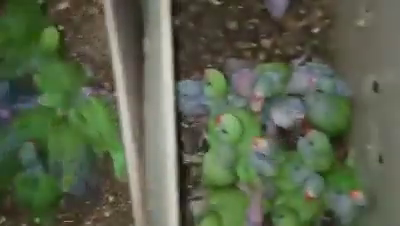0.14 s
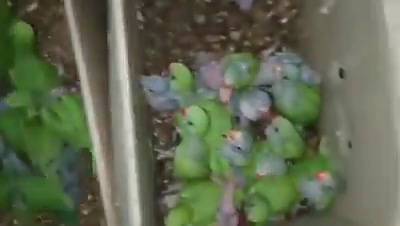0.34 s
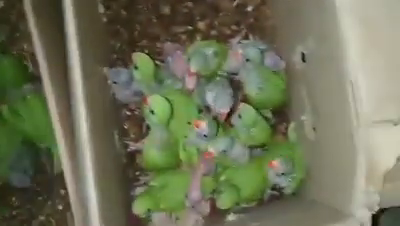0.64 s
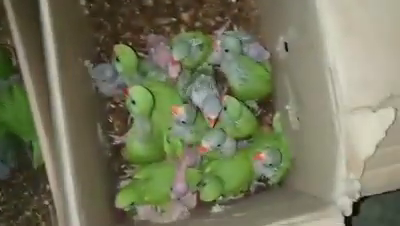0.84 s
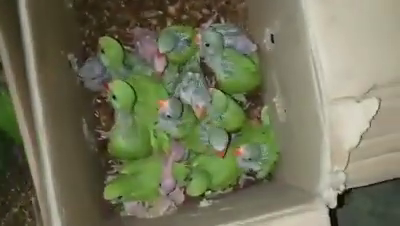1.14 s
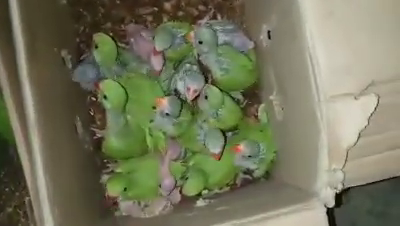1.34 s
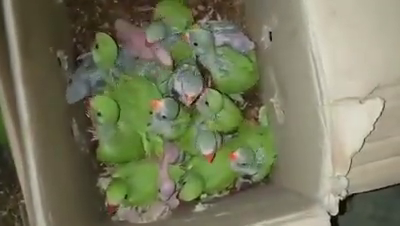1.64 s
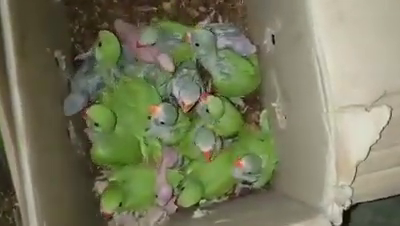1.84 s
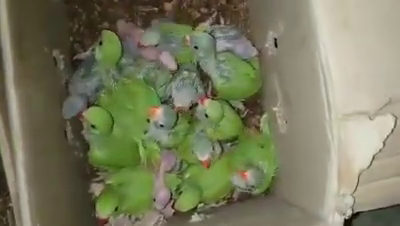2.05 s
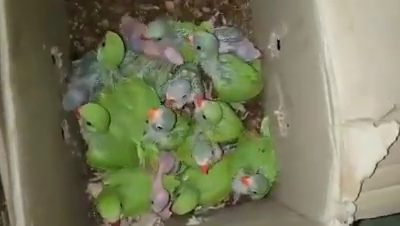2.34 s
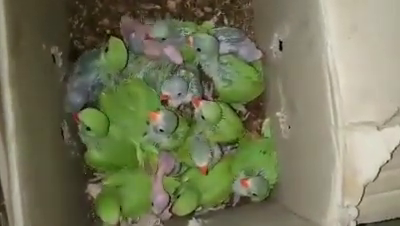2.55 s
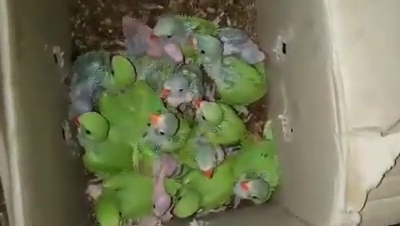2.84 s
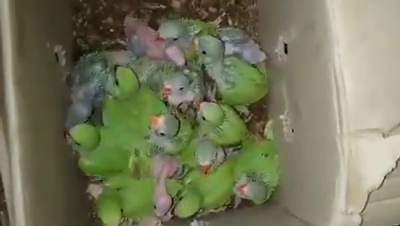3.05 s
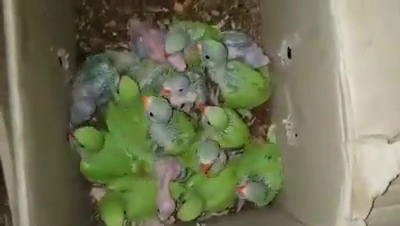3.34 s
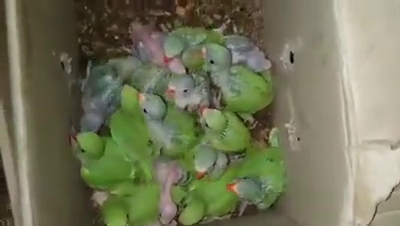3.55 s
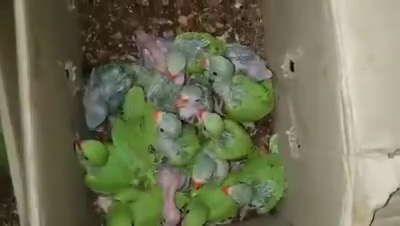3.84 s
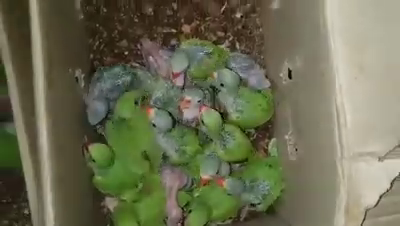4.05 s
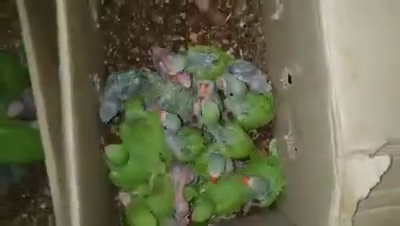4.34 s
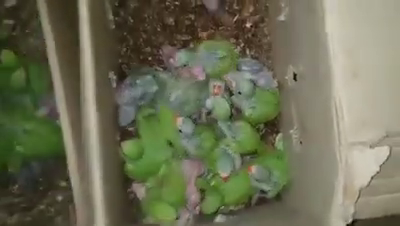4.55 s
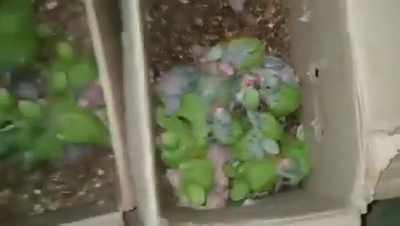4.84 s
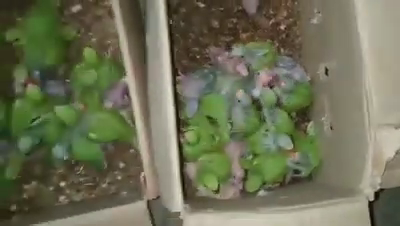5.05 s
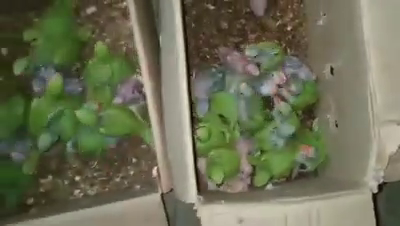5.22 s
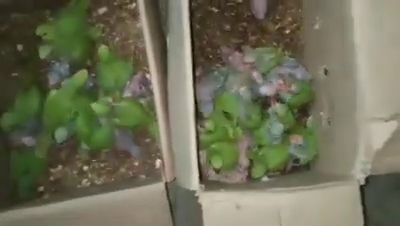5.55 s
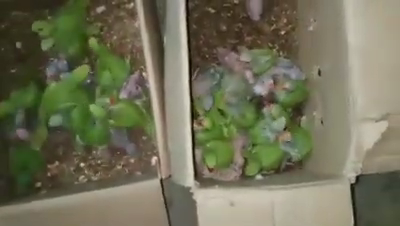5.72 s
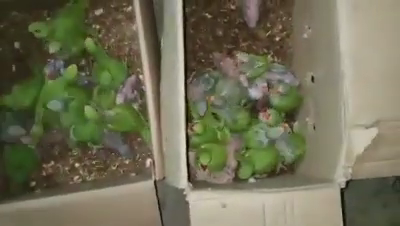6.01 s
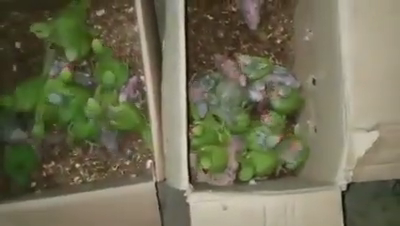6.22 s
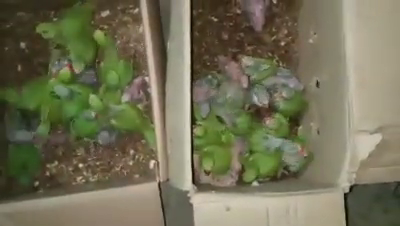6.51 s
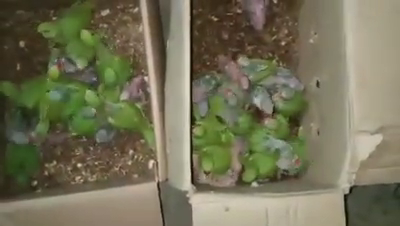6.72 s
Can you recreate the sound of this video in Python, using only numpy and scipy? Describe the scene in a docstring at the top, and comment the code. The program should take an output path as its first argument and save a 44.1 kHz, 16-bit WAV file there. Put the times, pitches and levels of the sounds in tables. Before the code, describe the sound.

Rough, squeaky begging calls from young parrots come in two quick rhythmic bursts, with quiet rasping, faint peeps and distant dove coos around them.

```python
"""Hoarse begging whistles leap up and slide down: parrot chicks call in turns and together,
in an open cardboard box just under a hand-held phone. Each whistle is a stack of overtones plus breath noise.
One chick rasps softly in the pause (clicks ringing resonances) and a small one peeps (short tones).
Feet scratch the litter (bursts of noise), doves coo further off (wavering tones), and behind them is
a dull murmur of the yard (filtered noise), turned down and let back by the phone's noise suppressor."""
import sys
import numpy as np
from scipy import signal
from scipy.fft import rfft, irfft
from scipy.io import wavfile

SR = 44100
rng = np.random.default_rng(int(sys.argv[2]) if len(sys.argv) > 2 else 0)


def int16_out(signal):
    """Quantize to a 16-bit WAV file."""
    q = np.round(np.clip(np.atleast_2d(signal).T, -1, 1) * 32767)
    wavfile.write(sys.argv[1], SR, q.astype(np.int16))


N = 303408
T = np.arange(N) / SR  # time of every sample, in seconds
BIN_HZ = np.arange(N // 2 + 1) * SR / N  # pitch of every spectrum bin
TOP_HZ = 15700  # the phone's top limit: overtones above it are left out, and the final filter cuts here


def undb(db):
    """Turn decibels into a gain."""
    return 10 ** (np.asarray(db) / 20)


def shape_db(table, hz):
    """Read a (pitch_hz, level_db) table, with straight lines between points on a log-pitch axis."""
    table_hz, table_db = np.transpose(table)
    return np.interp(np.log(np.maximum(hz, 1)), np.log(table_hz), table_db)


def colour(x, table):
    """Filter a sound by a (pitch_hz, level_db) table."""
    return irfft(rfft(x) * undb(shape_db(table, BIN_HZ)), N)


def unit(x):
    """Scale to an rms (average strength) of 1."""
    return x / np.sqrt(np.mean(x ** 2))


def wobble(rate_hz):
    """Slow random drift of rms 1: noise with everything faster than rate_hz smoothed away."""
    smoother = signal.butter(2, rate_hz, fs=SR, output="sos")
    return unit(signal.sosfilt(smoother, rng.standard_normal(N)))


def band(kind, hz, order):
    """A filter that keeps only part of the pitch range."""
    return signal.butter(order, hz, kind, fs=SR, output="sos")


def gate(t, start, end, rise, fall):
    """Ramp up from start over the rise time, then die away exponentially after end."""
    return np.clip((t - start) / rise, 0, 1) * np.exp(-np.maximum(t - end, 0) / fall)


def knee(ms, round_ms):
    """Flat at zero before 0, slope 1 after, with a rounded corner."""
    return round_ms * np.logaddexp(0, ms / round_ms)


# How throat and beak strengthen each pitch: pitch_hz [Hz], level_db [dB]
THROAT_TONE = [(800, -25), (1400, -12), (2400, -8.5), (3050, -5.5), (4050, -0.5), (4600, -4), (5200, -5),
               (6200, -11.5), (7300, -1.5), (8500, -14), (11500, -21.5), (14500, -13.5), (16000, -18)]
# The same throat blown by breath alone: pitch_hz [Hz], level_db [dB per Hz]
BREATH_TONE = [(300, -42), (885, -25), (1690, -9), (2450, -3), (3100, -3), (4050, -2), (5200, -10),
               (6200, -16), (7100, -11), (8500, -21), (11500, -26.5), (14700, -20), (16000, -33.5)]


def chick(calls, round_ms, climb_hz, drop_hz, hold_ms, dip_hz, dip_ms, tilt_db, fundamental_db, tired_db,
          breath_db, fade_db, strong, strong_db, tire_s, wear):
    """Overtones follow an arch of pitch through the throat, hoarse at the start and the break-off of a call."""
    out = np.zeros(N)
    jitter = wobble(350)
    flutter = [wobble(85) for _ in range(12)]
    breath = unit(colour(rng.standard_normal(N), BREATH_TONE))
    for apex_s, apex_hz, slide_hz_per_ms, level_db, lead_ms in calls:
        fresh = np.exp(-(apex_s - calls[0][0]) / tire_s)  # 1 at the first call; a fresh bird sings purer
        length_ms = hold_ms + drop_hz / slide_hz_per_ms  # the call breaks off after sliding by drop_hz
        first = max(int((apex_s - lead_ms / 1000) * SR), 0)
        last = min(int((apex_s + (length_ms + 90) / 1000) * SR), N)
        span = slice(first, last)
        ms = (T[span] - apex_s) * 1000  # time from the pitch apex

        corner_ms = round_ms * (lead_ms / 25) ** 4  # a long run-up gives a round arch
        hz = apex_hz - slide_hz_per_ms * knee(ms - hold_ms, corner_ms)
        hz -= climb_hz * np.clip(-ms / lead_ms, 0, 1) ** (lead_ms / 16)
        # a held call dips midway and sags; a negative dip sharpens the apex
        hz -= dip_hz * np.exp(-((ms - hold_ms / 2) / dip_ms) ** 2)
        hz -= 1.3 * np.clip(ms, 0, hold_ms)
        hoarse = np.exp(-(ms + lead_ms) / 17.0) + np.exp(np.minimum(ms - length_ms, 0) / 5.8)
        roughness = .004 + wear * (1 - fresh) + .06 * hoarse
        hz = np.maximum(hz, .5 * apex_hz) * (1 + roughness * jitter[span])
        phase = 2 * np.pi * np.cumsum(hz) / SR

        voice = np.zeros(len(ms))
        for k in range(1, 12):  # k = 1 is the fundamental
            gain_db = shape_db(THROAT_TONE, k * hz) + tilt_db * np.log2(k)
            if k == 1:
                gain_db += fundamental_db + tired_db * (1 - fresh)
            if k == strong:  # the partial that stands out
                gain_db += strong_db * fresh
            if k > strong:  # the upper overtones open up fully only at the apex
                gain_db -= 5.24 * np.clip(-ms / 8, 0, 1)
            patchy_db = np.clip(k * hz / 1100 - 2.6, 1.2, 8) * flutter[k][span]  # high overtones break up
            partial = np.sin(k * phase + .4 * k * k) * (k * hz < TOP_HZ)
            voice += undb(gain_db + patchy_db) * partial
        # the pure voice sets in as the pitch nears its apex
        voice *= gate(ms, -lead_ms, length_ms - 8.0, 17.4, 1.8)
        voice *= 1.08 + 0.45 * gate(ms, -.7 * lead_ms, length_ms, 3.1, 4.0)
        voice *= undb(2.5 - fade_db * np.clip(ms / length_ms, 0, 1))  # fades after the apex

        air = undb(breath_db + 4.84 * (3 - fresh)) * (0.1 + 0.46 * hoarse) * breath[span]
        air *= gate(ms, -lead_ms, length_ms, 3.1, 12.2)
        out[span] += undb(level_db) * (voice + air)
    return out


# Calls of the high chick: apex_s [s], apex_hz [Hz], slide [Hz per ms], level_db [dB, relative],
# lead_ms, the run-up to the apex [ms]
HIGH_CALLS = [(2.957, 2322, 18, -19.5, 32), (3.13, 2100, 19, -19, 25), (3.302, 2155, 18, -18, 27),
              (3.479, 2170, 17, -18, 25), (3.66, 2255, 16, -18, 32), (3.84, 2290, 19, -16, 31),
              (4.018, 2235, 19, -15.5, 27), (4.196, 2200, 21, -15, 26), (4.368, 2182, 18, -17.5, 24),
              (4.538, 2160, 18, -17.5, 24), (4.708, 2098, 19.5, -18, 24), (4.869, 2134, 15, -24, 24),
              (5.03, 2120, 19, -18, 24), (5.192, 2140, 20, -17, 22), (5.358, 2253, 23, -18, 22),
              (5.526, 2168, 18, -17, 15), (5.696, 2130, 17, -18.5, 24), (5.866, 2084, 20, -18, 21),
              (6.03, 2158, 21, -18, 24), (6.197, 2125, 24, -17, 23), (6.349, 2070, 21, -17.5, 21),
              (6.505, 2067, 19, -18, 21), (6.664, 2202, 21, -17.5, 19), (6.823, 2084, 21, -17.5, 21)]


def high_chick():
    """The highest voice: no hold at the top, a sharpened apex and a strong second partial."""
    return chick(HIGH_CALLS, round_ms=2.6, climb_hz=1250, drop_hz=989, hold_ms=0, dip_hz=-17.5, dip_ms=5.7,
                 tilt_db=-4.0, fundamental_db=0.23, tired_db=-9.5, breath_db=-9.5, fade_db=0.35,
                 strong=2, strong_db=9.0, tire_s=2.52, wear=0.0061)


# Calls of the low chick: apex_s [s], apex_hz [Hz], slide [Hz per ms], level_db [dB, relative], lead_ms [ms]
LOW_CALLS = [(-.025, 1550, 11, -22, 27.5), (.127, 1538, 14, -22.5, 26.76), (.281, 1525, 15, -22.5, 24.33),
             (.44, 1492, 13, -26, 25), (4.356, 1697, 16, -25.5, 33.55), (4.522, 1654, 14, -26.5, 33.4),
             (4.688, 1620, 8.6, -27, 29.8), (4.861, 1570, 9.9, -25.5, 31.1),
             (5.04, 1610, 9.2, -26.5, 27.17), (5.212, 1540, 9, -26, 27.78), (5.395, 1626, 8, -24.5, 28.28),
             (5.588, 1620, 7.6, -26, 27.43)]


def low_chick():
    """A lower voice that roughens as it tires, with a strong third partial."""
    return chick(LOW_CALLS, round_ms=4, climb_hz=850, drop_hz=716, hold_ms=0, dip_hz=-8.5, dip_ms=7.0,
                 tilt_db=-0.35, fundamental_db=6.5, tired_db=2.33, breath_db=-6.5, fade_db=9.0,
                 strong=3, strong_db=5.5, tire_s=3.6, wear=0.026)


# Calls of the wavering chick: apex_s [s], apex_hz [Hz], slide [Hz per ms], level_db [dB, relative], lead_ms [ms]
WAVERING_CALLS = [(-.012, 1516, 12, -24, 26.6), (.177, 1500, 13, -21, 26.96),
                  (.366, 1435, 10.7, -19.5, 21.9), (.557, 1401, 10.6, -17.5, 27.07),
                  (.758, 1343, 11, -18.5, 29.96), (.972, 1431, 10.3, -18.5, 30.12)]


def wavering_chick():
    """A voice that holds its pitch for a moment, dips midway and then slides down."""
    return chick(WAVERING_CALLS, round_ms=3.0, climb_hz=900, drop_hz=485, hold_ms=30, dip_hz=100, dip_ms=8.3,
                 tilt_db=-3.0, fundamental_db=-2.15, tired_db=-9.5, breath_db=-2, fade_db=3.8,
                 strong=3, strong_db=4.5, tire_s=14.0, wear=.015)


# Soft rasps: start_s [s], end_s [s], level_db [dB]
RASP_TIMES = [(1.09, 1.236, -44), (1.336, 1.844, -44), (2.811, 2.96, -54)]
# Resonances the rasps ring: pitch_hz [Hz], width_hz [Hz], level_db [dB, relative]
RASP_RESONANCES = [(694, 270, -4), (1744, 216, 9), (2270, 470, 0.5), (3715, 600, -9), (6840, 1300, 1),
                   (14430, 2800, -7)]


def rasp():
    """Uneven clicks of a slack syrinx (the voice organ), some 290 a second, ring a few broad resonances."""
    draw = rng.standard_normal((N // 100, 2))  # chance for the gap and the strength of each click
    at = np.cumsum(SR / 290 * np.exp(0.33 * draw[:, 0])).astype(int)
    clicks = 0.019 * rng.standard_normal(N)  # faint hiss between the clicks
    clicks[at[at < N]] += undb(2.0 * draw[at < N, 1])
    ring = np.zeros(N)
    for pitch_hz, width_hz, level_db in RASP_RESONANCES:
        b, a = signal.iirpeak(pitch_hz, pitch_hz / width_hz, SR)
        ring += undb(level_db) * unit(signal.filtfilt(b, a, clicks))
    loudness = sum(undb(level_db) * gate(T, start_s, end_s, 0.00054, 0.0032)
                   for start_s, end_s, level_db in RASP_TIMES)
    return unit(ring) * loudness


# Peeps: start_s [s], pitch_hz [Hz], length_ms [ms], level_db [dB],
# second_db, the second partial and those above it against the first [dB]
PEEP_NOTES = [(2.265, 1194, 124, -61.5, -5.5), (2.428, 1074, 43, -58.5, 0), (2.553, 1043, 31, -59.5, 7.5)]


def peeps():
    """Short notes of four partials, level in pitch but for a small random waver."""
    out = np.zeros(N)
    for start_s, pitch_hz, length_ms, level_db, second_db in PEEP_NOTES:
        phase = 2 * np.pi * np.cumsum(pitch_hz * (1 + .02 * wobble(60))) / SR
        upper = np.sin(2 * phase) + 0.33 * np.sin(3 * phase) + 0.19 * np.sin(4 * phase)
        loudness = undb(level_db) * gate(T, start_s, start_s + length_ms / 2000, 0.0062, length_ms / 5000)
        out += loudness * (np.sin(phase) + undb(second_db) * upper)
    return out


# Scratches in the litter: start_s [s], level_db [dB, before a shared 11 dB cut],
# t60_s, the time to die away by 60 dB [s]
SCRATCH_TIMES = [(2.0876, -40, 0.033), (2.107, -33.5, 0.056), (2.464, -36, 0.045)]


def scratches():
    """Feet in the litter: bright bursts of gritty noise that start at once and die away fast."""
    grit_tone = [(300, -20), (2200, 2.5), (5000, -9), (7500, 0.5), (16000, -17)]  # pitch_hz, level_db
    grit = unit(colour(rng.standard_normal(N), grit_tone))
    loudness = sum(undb(level_db - 11.0) * gate(T, start_s, start_s, 0.00039, t60_s / np.log(1000))
                   for start_s, level_db, t60_s in SCRATCH_TIMES)
    return grit * loudness


# Notes of two doves, one near 400 Hz and one near 540 Hz:
# start_s [s], pitch_hz [Hz], length_ms [ms], level_db [dB, before a shared 3.5 dB lift]
DOVE_NOTES = [(1.4, 414, 154, -61), (1.87, 512, 155, -59), (2.049, 434, 133, -62.5),
              (2.298, 397, 155, -55.5), (3.74, 440, 91, -51.5), (3.88, 418, 230, -56),
              (4.181, 419, 147, -50), (4.782, 354, 107, -51), (4.88, 541, 120, -50.5),
              (5.077, 382, 140, -48), (5.228, 423, 126, -47), (5.37, 440, 323, -57.5),
              (5.702, 369.6, 141, -48.5), (5.729, 550, 114, -53.5), (5.93, 367, 120, -53.5),
              (6.13, 392, 215, -55), (6.4, 403, 244, -58)]


def doves():
    """Near-pure notes that waver a little in pitch and throb in level with the throat."""
    out = np.zeros(N)
    waver = 1 + .03 * wobble(14)
    throb = undb(4 * wobble(35))
    for start_s, pitch_hz, length_ms, level_db in DOVE_NOTES:
        bell = np.sin(np.pi * np.clip((T - start_s) * 1000 / length_ms, 0, 1)) ** 0.32  # swells and fades
        tone = np.sin(2 * np.pi * np.cumsum(pitch_hz * waver) / SR)
        out += undb(level_db + 3.5) * bell * throb * tone
    return out


# Level of the yard's murmur as the phone's noise suppressor turns it down and lets it back:
# time_s [s], level_db [dB, before a shared 8 dB lift]
MURMUR_LEVEL = [(0, -46.5), (1.26, -45), (1.3, -60.5), (1.86, -54.5), (1.93, -88), (2.48, -71.5),
                (2.53, -96.5), (2.78, -78), (2.9, -50), (5.4, -46), (5.78, -64), (6.3, -49)]
# Tone of the murmur: pitch_hz [Hz], level_db [dB per Hz, relative]
MURMUR_TONE = [(200, -31.5), (350, -22.5), (550, -3), (800, -0.5), (2000, -9), (5000, -15), (7500, -15),
               (16000, -67)]


def yard():
    """Dull noise, partly alike left and right; each octave flickers alone."""
    out = np.zeros((2, N))
    both = np.array([unit(colour(rng.standard_normal(N), MURMUR_TONE)) for _ in range(2)])
    for low_hz in 50 * 2 ** np.arange(8):
        octave = signal.sosfilt(band("bandpass", [low_hz, 2 * low_hz], 2), both)
        mid, side = octave * undb(2.2 * wobble(12))
        out += mid + .7 * side * np.array([[1], [-1]])  # side has opposite sign left and right
    return undb(np.interp(T, *np.transpose(MURMUR_LEVEL)) + 8) * out


ROOM_T60_S, ROOM_DB = 0.25, -6  # time for the tail to die away by 60 dB; tail level


def room(x):
    """The box and nearby walls: a short decaying tail of noise, different at each microphone port."""
    t = np.arange(SR // 2) / SR
    decay = np.exp(-np.log(1000) * t / ROOM_T60_S) * np.clip(t / 0.0031, 0, 1)
    tail = rng.standard_normal((2, len(t))) * decay
    tail /= np.sqrt(np.sum(tail ** 2, axis=1, keepdims=True))
    return undb(ROOM_DB) * signal.fftconvolve(x[None], tail, axes=1)[:, :N]


# Phase shift between left and right by pitch, whole turns (in step again) in the treble:
# pitch_hz [Hz], shift [radians, before each sound's share]
STEREO_SHIFT = [(0, 0), (950, .7), (2300, 6.7), (3270, 10.7), (5850, 6 * np.pi)]


def seat(x, shift_share, pan_db):
    """Widen a sound by shifting the phase of its left side by pitch, and set its left-right balance."""
    shift = shift_share * np.interp(BIN_HZ, *np.transpose(STEREO_SHIFT))
    left = irfft(rfft(x) * np.exp(-1j * shift), N) * undb(pan_db / 2)
    right = x * undb(-pan_db / 2)
    return np.array([left, right])


# Level above 10.5 kHz as the phone swings about: time_s [s], level_db [dB]
TREBLE_LEVEL = [(1, 1), (3.9, -1), (4.5, -1.5), (6.88, -6.5)]


def swing_treble(birds):
    """The phone swings about, so the top treble of the calls slowly changes level."""
    top = signal.sosfiltfilt(band("highpass", 10500, 4), birds)
    return birds + top * (undb(np.interp(T, *np.transpose(TREBLE_LEVEL))) - 1)


def scene():
    """Mix the calls, the soft sounds of the box, the far doves and the yard."""
    high, low, wavering = high_chick(), low_chick(), wavering_chick()
    near = seat(high, 0.97, 0.94) + seat(low, 0.735, .3) + seat(wavering, 0.97, -0.21)
    birds = swing_treble(near + room(high + low + wavering))
    soft = rasp() + peeps() + scratches()
    far = doves()
    return birds + seat(soft, 0.94, .3) + room(soft) + far + room(far) + yard()


# Colour of the two microphone ports: pitch_hz [Hz], left minus right level_db [dB]
PORT_DIFFERENCE = [(60, -.5), (1300, .5), (2400, -1), (4600, 0), (6500, -9), (9000, -10), (15000, -6)]


def record(dry):
    """The two ports differ in colour; the loudest peaks are rounded and the top is cut."""
    left_tone = [(hz, db / 2) for hz, db in PORT_DIFFERENCE]
    right_tone = [(hz, -db / 2) for hz, db in PORT_DIFFERENCE]
    ports = np.array([colour(dry[0], left_tone), colour(dry[1], right_tone)])
    rounded = ports / (1 + ports ** 4) ** .25
    return signal.sosfilt(signal.ellip(8, .2, 70, TOP_HZ, fs=SR, output="sos"), rounded)


dry = scene()
out = record(dry)
int16_out(out)
```